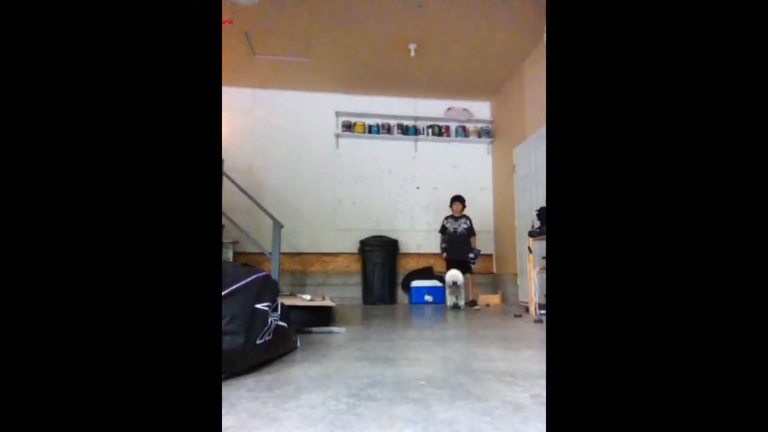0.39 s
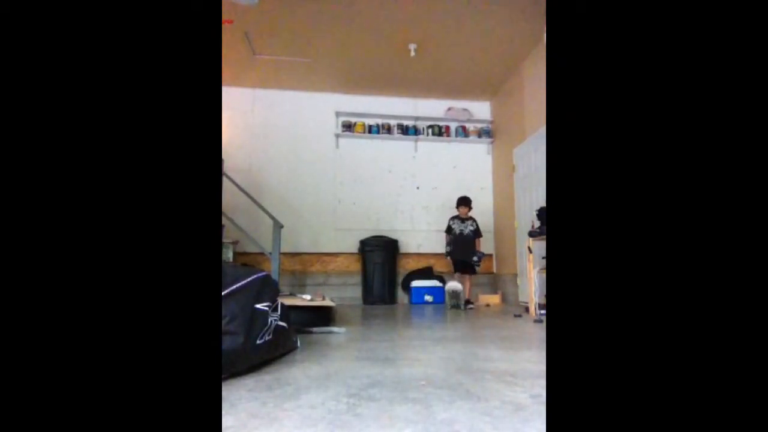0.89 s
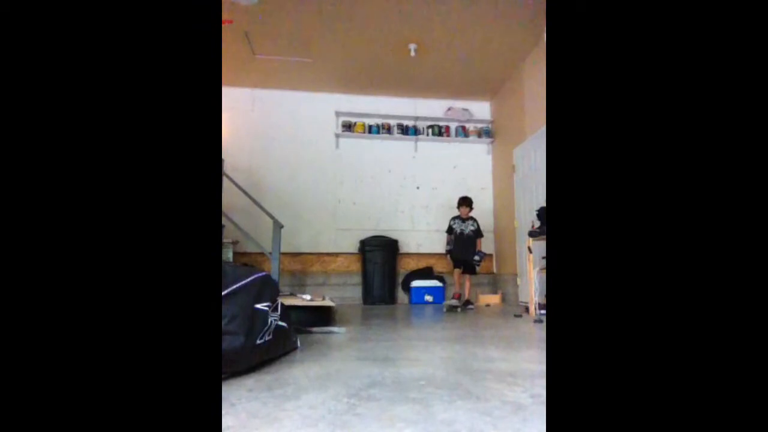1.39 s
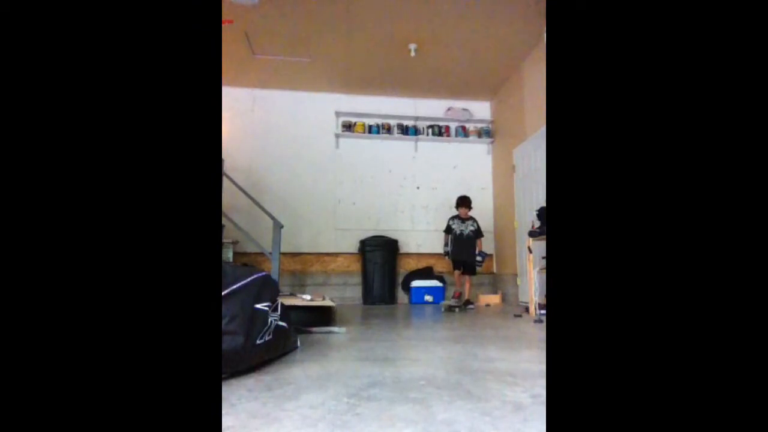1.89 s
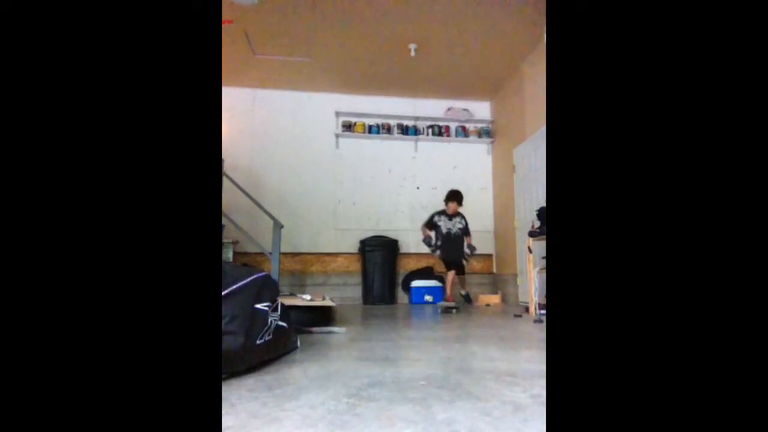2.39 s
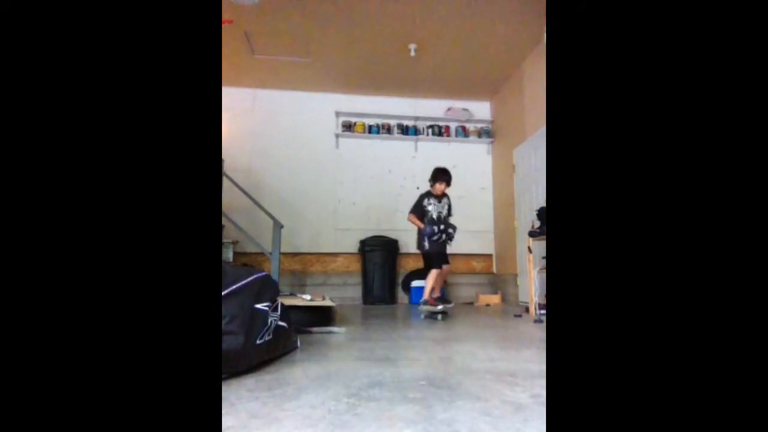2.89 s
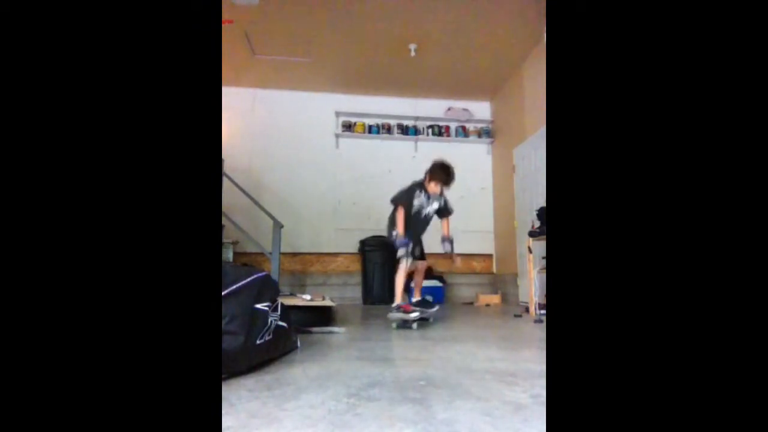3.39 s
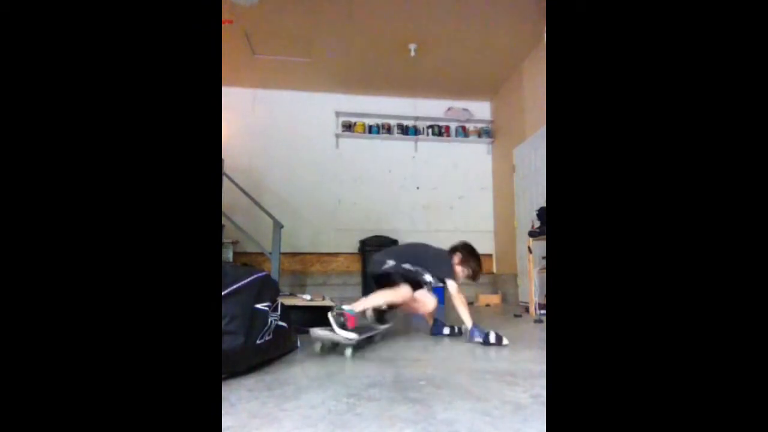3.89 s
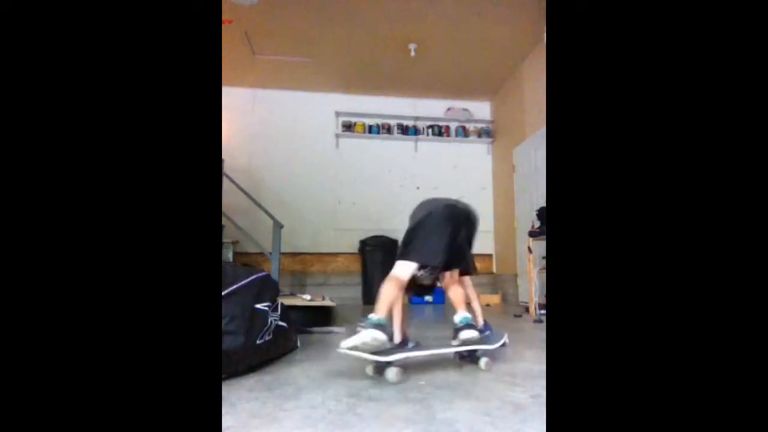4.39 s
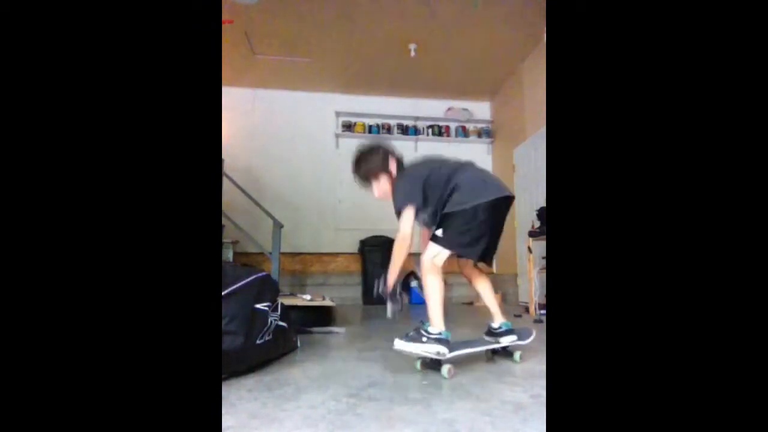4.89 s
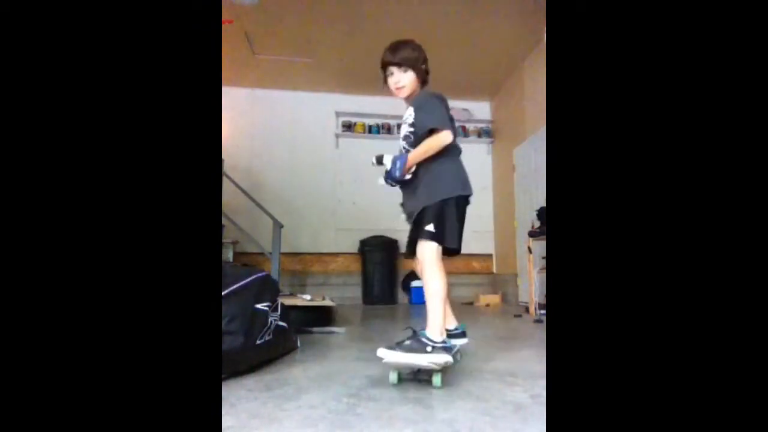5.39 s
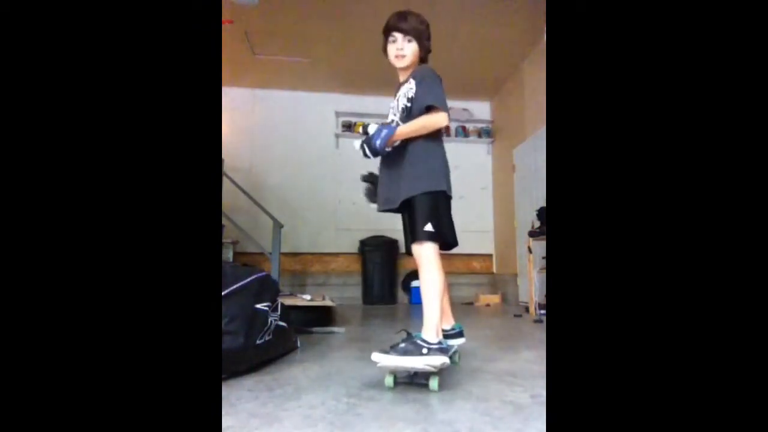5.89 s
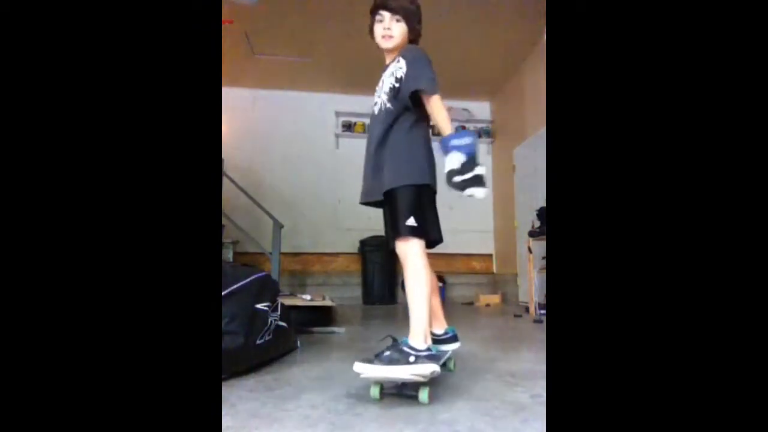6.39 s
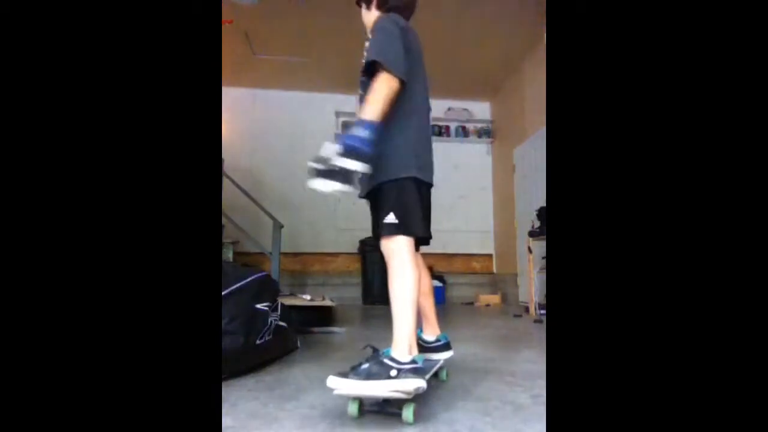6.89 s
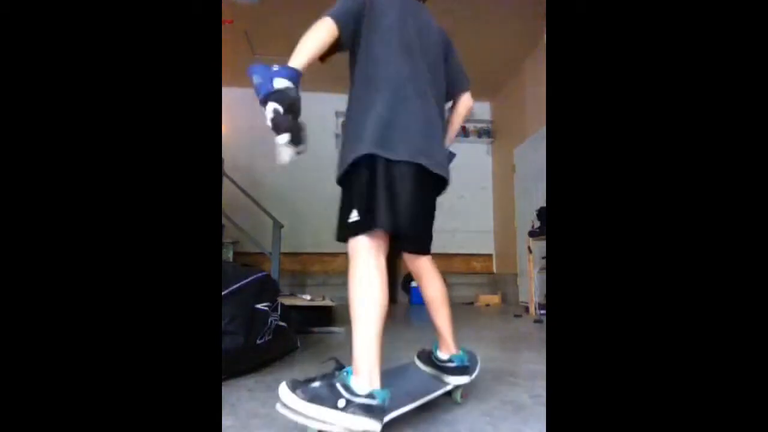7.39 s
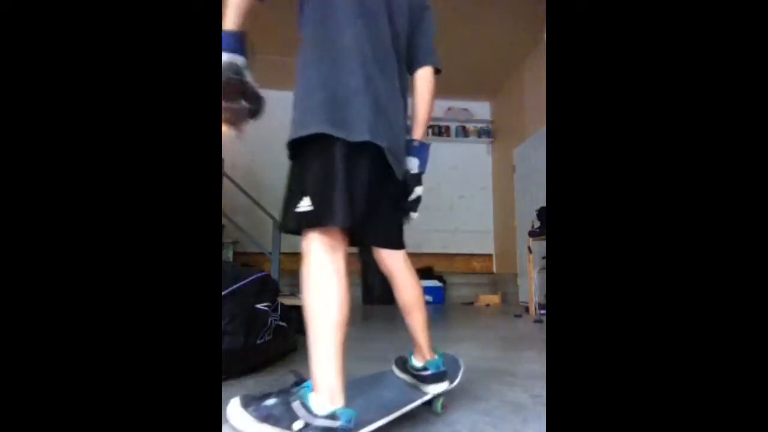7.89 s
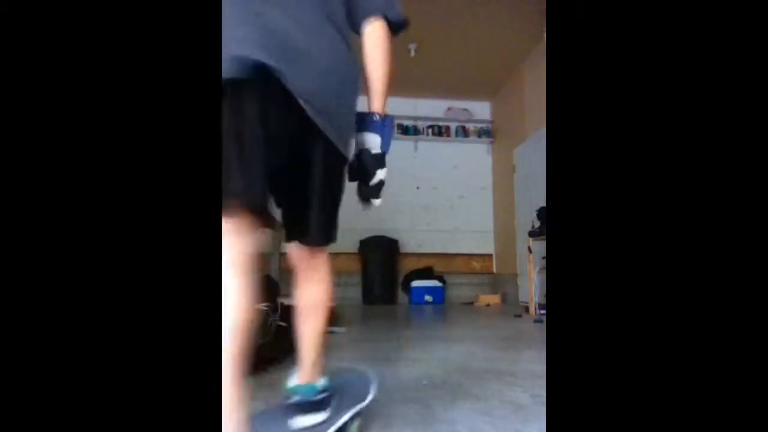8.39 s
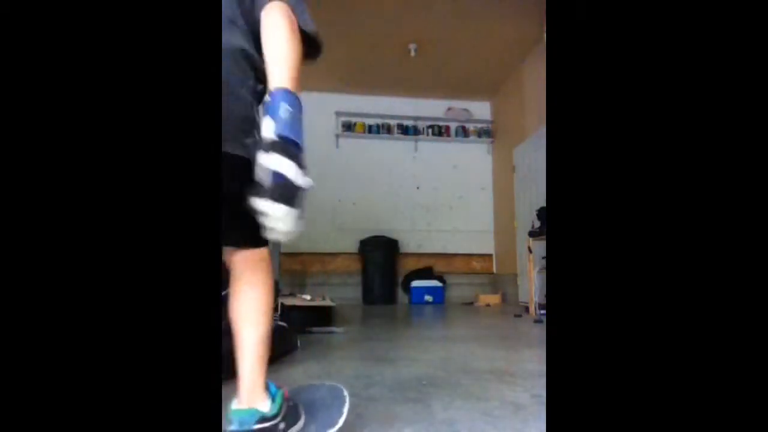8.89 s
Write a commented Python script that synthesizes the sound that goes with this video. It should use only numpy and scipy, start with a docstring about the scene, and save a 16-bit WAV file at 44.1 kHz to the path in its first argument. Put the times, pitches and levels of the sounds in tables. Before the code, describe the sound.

In a closed concrete garage, a skateboard lands with a quick rattle of clacks, then a loud slap. After a pause it is pushed off, its wheels rolling with a gritty wooden drone that swells into a harsh sliding scrape. Quiet ticks and creaks follow, then sharp knocks of small turns come closer. A phone on the floor hears it with a short room echo over faint hiss.

```python
"""A skateboard in a closed concrete garage, heard by a phone on the floor: it is dropped, pushed towards
the phone, slid sideways and then shuffled round in small kick turns. Knocks and grit under the wheels ring
the modes of the wooden deck; wheels and shoes scrape as shaped speckled noise, rubber sings as gliding
tones, bushings creak in trains of short scratches. A diffuse room tail answers over a faint noise hush."""
import sys
import numpy as np
from scipy import signal
from scipy.fft import rfft, irfft
from scipy.io import wavfile
from scipy.ndimage import uniform_filter1d

SR = 44100
rng = np.random.default_rng(int(sys.argv[2]) if len(sys.argv) > 2 else 0)


def dump_mix(stems):
    """Bounce the given channels to the path in sys.argv[1] as a 16-bit WAV at rate SR."""
    frames = np.atleast_2d(stems).T  # one column per channel
    limited = np.clip(frames, -1, 1)  # hard clip at full scale
    pcm = np.round(limited * 32767).astype(np.int16)
    wavfile.write(sys.argv[1], SR, pcm)


def gain_from_db(level_db):
    """Convert decibel levels to linear amplitude factors (20 dB per decade)."""
    decades = np.asarray(level_db, float) / 20
    return 10 ** decades


N = 397782
T = np.arange(N) / SR

# modes of deck, trucks and wheels: (pitch [Hz], level [dB])
BOARD = [(140, -36.5), (205, -16.5), (363, -5.5), (535, -0.5), (745, 3.5), (815, 3), (930, 2), (1060, 2.5),
         (1190, 3), (1340, 2.5), (1480, 4), (1620, 4.5), (1780, 5.5), (1950, 5.5), (2180, 3.5), (2340, 3),
         (2750, -3), (3710, 0), (4450, -4), (5300, -3.5), (6700, -4)]
BOARD_LOSS = 0.13  # mode width over mode pitch


def level(x, db=0):
    """Scale to an rms level."""
    return x * gain_from_db(db) / np.sqrt(np.mean(x ** 2))


def colour(x, points):
    """Shape the spectrum along (frequency [Hz], gain [dB]) points, joined over log frequency."""
    hz, db = np.transpose(points)
    f = np.maximum(np.arange(len(x) // 2 + 1) * SR / len(x), 1)
    gain = gain_from_db(np.interp(np.log(f), np.log(hz), db))
    return irfft(rfft(x) * gain, len(x))


def band(x, hz, width_hz):
    """One resonance, gain 1 at the centre."""
    return signal.lfilter(*signal.iirpeak(min(hz, 0.45 * SR), hz / width_hz, SR), x)


def curve_db(rows):
    """(time [s], level [dB]) rows joined over time, silent outside them."""
    time_s, db = np.transpose(rows)
    return np.interp(T, time_s, db, -110, -110)


def swell(peak_s, rise_s, hold_s, fall_s, db):
    """Gain that climbs 20 dB in rise_s, holds, and drops 20 dB in fall_s."""
    before = (peak_s - T) / rise_s
    after = np.maximum(T - peak_s - hold_s, 0) / fall_s
    return gain_from_db(db - 20 * np.maximum(before, after))


def grit(specks_per_s, spread_db):
    """Specks of grit struck at random moments, a few much bigger than the rest."""
    struck = rng.random(N) < specks_per_s / SR
    size = gain_from_db(spread_db * np.minimum(rng.exponential(size=N), 6))
    return level(struck * rng.standard_normal(N) * size)


def walk(rate_hz):
    """Random targets 1 / rate_hz apart, joined by slews; rms near 1."""
    k = int(SR / rate_hz)
    steps = np.repeat(rng.standard_normal(N // k + 1), k)
    return level(uniform_filter1d(steps, k)[:N])


def board(loss=BOARD_LOSS):
    """Every mode's ring after a tap, one row a mode, neighbours in opposite phase."""
    tap = 1.0 * (T[:SR // 8] == 0)
    return np.array([(-1) ** k * gain_from_db(db) * band(tap, hz, loss * hz) for k, (hz, db) in enumerate(BOARD)])


def near(hz, octaves):
    """How strongly a contact pitched at hz reaches each mode."""
    mode_hz = np.array(BOARD)[:, 0]
    return np.exp(-(np.log2(mode_hz / hz) / octaves) ** 2)


def deck(force):
    """Soft wheels reach only the plywood's modes; shifting feet damp now one mode, now another."""
    out = 0
    for k, (hz, db) in enumerate(BOARD):
        gain = (-1) ** k * gain_from_db(db + 1.64 * walk(14))
        softness = 1 + (hz / 2060) ** 8  # soft wheels shake the higher modes less
        out = out + gain * band(force, hz, BOARD_LOSS * hz) / softness
    return out


def hush():
    """One shaped noise for far traffic, air through the door and microphone hiss; a low wavering hum."""
    # background spectrum: (frequency [Hz], gain [dB])
    hush_spectrum = [(25, -20.5), (116, 2.5), (178, -3.5), (240, -2), (552, -14.5), (6730, -20.5),
                     (15500, -21.5)]
    air = level(colour(rng.standard_normal(N), hush_spectrum), -56.5) * gain_from_db(0.7 * walk(2.5))
    hum = level(band(rng.standard_normal(N), 138, 8), -66)
    return air + hum


def knocks():
    """Each blow rings the modes near its pitch over a wide snap and a low thud; direct sound and room send."""
    # knocks and ticks: (time [s], level [dB], pitch struck [Hz], snap re level [dB], deck body re level [dB])
    knock_rows = [(0.0105, -0.5, 2190, -12.5, -24.5), (0.0582, -5.5, 1540, -7, -13.5),
                  (0.093, -8.5, 2350, -6.5, -15.5), (0.131, -11.5, 1890, -8.5, -16),
                  (1.311, -5.5, 883, 0.5, -19), (1.32, 2.5, 1050, -3, -15.5), (1.335, -4.5, 900, -13, -15),
                  (2.29, -24.5, 734, 0, -6), (3.131, -6.5, 1760, 3, -14), (4.64, -27, 1600, 5.5, -7),
                  (4.8, -33, 820, -4, -8), (5.0365, -18.5, 2370, -13, -28), (5.0525, -15.5, 2500, -6, -31),
                  (5.363, 2.5, 790, 1.5, -21), (5.376, -2.5, 770, -7, -35), (6.117, -19, 3000, -2, -38),
                  (6.2403, -12, 2650, -7, -29), (7.112, -1.5, 3100, -8.5, -52), (7.241, -17, 1800, -6, -24),
                  (7.268, -21, 1000, -1, -7), (7.302, -7, 2480, -13, -21.5), (7.318, -4, 2450, -14, -23),
                  (7.329, -4.5, 1430, 0, -13.5), (7.671, -23, 2020, -12, -20), (7.693, 1, 1580, -1, -16.5),
                  (8.438, 0.5, 1240, -0.5, -14.5), (8.456, 1, 1270, 4.5, -13), (8.465, -8, 1590, 2.5, -8.5),
                  (8.777, -15, 1390, -0.5, -11.5), (8.37, -18, 1790, 0.5, -19)]
    # board to phone: (time [s], distance [m])
    distance_rows = [(0, 2.88), (2.3, 3.33), (7, 2.54), (8, 1.6), (9.02, 0.89)]
    echo_1m_db, rattle_s_per_m = -12, 0.0031  # room send at 1 m; decay of the smear
    t = T[:SR // 8]
    tap = 1.0 * (t == 0)
    modes = board()
    thud, body = near(150, 0.85) @ modes, near(557, 0.76) @ modes
    snap = band(band(tap, 2700, 7100), 3500, 11000)
    direct, send = np.zeros(N + len(t)), np.zeros(N + len(t))
    splinters = rng.standard_normal((len(knock_rows), len(t)))
    favour = gain_from_db(1.86 * rng.standard_normal((len(knock_rows), len(BOARD))))  # each spot favours other modes
    for (s, db, hz, snap_db, body_db), noise, share in zip(knock_rows, splinters, favour):
        metres = np.interp(s, *np.transpose(distance_rows))
        ring = (near(hz, 0.37) + gain_from_db(4) * near(hz, 1.09)) * share @ modes
        thud_db = body_db - 10  # a blow that flexes the deck has weight behind it
        parts = (ring, -5), (snap, snap_db), (body, body_db), (thud, thud_db)
        blow = gain_from_db(db) * sum(gain_from_db(part_db) * part / np.abs(part).max() for part, part_db in parts)
        # loose hardware and the surfaces close by smear the first milliseconds
        smear = gain_from_db(-24.5) * noise * np.exp(-t / (rattle_s_per_m * metres))
        rattle = gain_from_db(-0.5) * tap + smear
        i = int(s * SR)
        direct[i:i + len(t)] += signal.fftconvolve(blow, rattle)[:len(t)]
        send[i:i + len(t)] += blow * gain_from_db(echo_1m_db) * metres
    return direct[:N], send[:N]


def garage():
    """Room response: dense echoes that build up over the first trips and decay at a rate set per octave."""
    # reverberation: (frequency [Hz], time to fall 60 dB [s])
    room_t60 = [(120, 0.15), (700, 0.5), (1800, 0.37), (4500, 0.52), (12000, 0.38)]
    t = T[:SR]
    hz, t60_s = np.transpose(room_t60)
    tail = 0
    for centre_hz in 88 * 2 ** np.arange(8):
        decay_s = np.interp(np.log(centre_hz), np.log(hz), t60_s)
        edges_hz = [centre_hz / np.sqrt(2), centre_hz * np.sqrt(2)]
        sos = signal.butter(2, edges_hz, "band", fs=SR, output="sos")
        tail = tail + signal.sosfilt(sos, rng.standard_normal(SR)) * gain_from_db(-60 * t / decay_s)
    tail = tail * np.clip((t - 0.004) / 0.018, 0, 1)
    return tail / np.sqrt(np.sum(tail ** 2))


def shuffle():
    """Slow wheels drone in the deck; patchy rubs ring the trucks, each with its own brightness."""
    # slow wheels, shifting rider: (peak [s], 20 dB rise [s], 20 dB fall [s], deck drone level [dB])
    creep_rows = [(.14, 0.1, 0.43, -33), (5.341, 0.16, 0.28, -35.5), (6.0, 0.6, 19, -55.5),
                  (7.1, .5, 1, -51.5), (7.47, 0.22, 0.14, -31.5), (8.06, 0.17, 0.08, -34),
                  (8.42, 0.22, 0.27, -32), (8.78, 0.3, 0.14, -43.5), (9.02, 0.3, -5, -45.5)]
    # shoes, gloves and wheels rubbing: (time [s], length [s], level [dB], gain above 4.5 kHz [dB])
    scuff_rows = [(0.15, 0.345, -52, 11), (0.484, 0.15, -51.5, 12), (2.955, 0.039, -26, -11),
                  (5.005, 0.071, -35.5, -11), (5.93, 0.16, -47.5, -1.5), (6.25, 0.055, -36, -19),
                  (6.325, 0.15, -48, -2), (7.212, 0.3, -48.5, 14.5), (7.435, 0.062, -22.5, -10.5),
                  (8.003, 0.085, -36.5, 2.5), (8.268, 0.042, -41, -18), (8.323, 0.073, -37.5, -5),
                  (8.858, 0.061, -40, -0.5)]
    # rub spectrum: (frequency [Hz], gain [dB])
    scuff_spectrum = [(590, -21), (1000, -8.5), (1610, -8), (1940, -11), (2230, 0.5), (3800, -10),
                      (6700, -9.5), (16000, -32)]
    rise_share, release_s = 0.18, 0.018  # rise as a share of the length
    drone = level(deck(grit(3000, 2.75))) * gain_from_db(0.85 * walk(31))
    grains = grit(3500, 2.2)
    trucks = signal.oaconvolve(grains, near(3250, 0.16) @ board())[:N]
    rub = level(level(colour(grains, scuff_spectrum)) + level(trucks, -1.1)) * gain_from_db(2.66 * walk(60))
    top = signal.sosfilt(signal.butter(2, 4500, "high", fs=SR, output="sos"), rub)
    out = drone * sum(swell(s, rise_s, 0, fall_s, db) for s, rise_s, fall_s, db in creep_rows)
    for s, length_s, db, bright_db in scuff_rows:
        rise = np.clip((T - s) / (rise_share * length_s), 0, 1) ** 2
        release = np.clip((s + length_s - T) / release_s + 1, 0, 1)
        out = out + rise * release * gain_from_db(db) * (rub + (gain_from_db(bright_db) - 1) * top)
    return out


def bumps():
    """A chatter of grit rings the deck with broad, brief modes, favouring other modes each time."""
    # wheels settling or skipping: (time [s], length [s], level [dB], pitch struck [Hz])
    bump_rows = [(1.676, 0.021, -33.5, 1060), (1.813, 0.023, -34, 990), (1.888, 0.052, -44, 870),
                 (8.015, 0.013, -26.5, 2020), (8.051, 0.012, -33.5, 2230), (8.085, 0.0067, -36, 2200)]
    out, modes = np.zeros(N), board(0.17)
    favour = gain_from_db(1.2 * rng.standard_normal((len(bump_rows), len(BOARD))))
    for (s, length_s, db, hz), share in zip(bump_rows, favour):
        ring = (near(hz, 1.0) + 0.16) * share @ modes
        chatter = grit(5500, 2.5) * ((T > s) & (T < s + length_s))
        out += gain_from_db(db) * signal.oaconvolve(chatter, ring / np.sqrt(np.sum(ring ** 2)))[:N]
    return out


def roll():
    """Grit shakes the deck, urethane scrapes on concrete, the slab and trucks rumble."""
    # steady run towards the phone: (time [s], deck drone level [dB])
    roll_rows = [(2.285, -43), (2.52, -30.5), (2.9, -36), (3.3, -42), (3.7, -26.5), (3.9, -16), (4.06, -17),
                 (4.3, -24), (4.5, -31.5), (4.7, -37.5), (4.9, -60.5)]
    # pushes, weight shifts and slides that press the wheels down:
    # (peak [s], 20 dB rise [s], deck drone level [dB], scrape re drone [dB])
    surge_rows = [(2.312, 0.0068, -28, 1.5), (2.742, 0.17, -22, -11.5), (3.055, 0.113, -23, -8.5),
                  (3.131, 0.17, -20, -16), (3.5, 0.34, -25, -12), (3.79, 0.1741, -23, -11),
                  (4.098, 0.0757, -9.5, -10), (4.227, 0.1474, -17, -8), (4.36, 0.1014, -10, -5),
                  (4.386, 0.0425, -18, 1)]
    # scrape spectrum: (frequency [Hz], gain [dB])
    scrape_spectrum = [(1290, -28.5), (2200, 1), (4070, -2), (6260, -0.5), (7840, -6.5), (9410, -4),
                       (15200, -20.5)]
    # slab and trucks: (time [s], level [dB])
    rumble_rows = [(2.3, -47), (3.15, -42.5), (3.35, -46.5), (3.7, -32), (3.84, -24.5), (4.0, -35),
                   (4.4, -52)]
    hold_share, fall_share = 0.19, 0.93  # of a surge's rise
    steady_db = curve_db(roll_rows)
    load = gain_from_db(steady_db)
    slide = gain_from_db(1 + 1.587 * steady_db)  # scrape grows faster than drone
    for s, rise_s, db, scrape_db in surge_rows:
        press = swell(s, rise_s, hold_share * rise_s, fall_share * rise_s, db)
        load = np.hypot(load, press)
        slide = np.hypot(slide, press * gain_from_db(scrape_db))
    drone = level(deck(grit(4000, 1.85))) * load * gain_from_db(1.58 * walk(25.03))
    grains = grit(8000, 1.7)
    scrape = level(colour(grains, scrape_spectrum)) * slide * gain_from_db(3.58 * walk(40))
    rumble = level(band(band(rng.standard_normal(N), 135, 90), 160, 160))
    return drone + scrape + rumble * gain_from_db(curve_db(rumble_rows) + 2.5 * walk(12))


def squeals():
    """Dragging rubber sings: a wavering, patchy tone that glides from one pitch to the other."""
    # drags: (time [s], length [s], start pitch [Hz], end pitch [Hz], level [dB])
    squeal_rows = [(4.081, 0.32, 340, 401, -28.5), (7.987, 0.046, 3850, 3800, -44),
                   (8.317, 0.051, 3800, 3880, -40)]
    out = 0
    for s, length_s, start_hz, end_hz, db in squeal_rows:
        part = np.clip((T - s) / length_s, 0, 1)
        hz = (start_hz + (end_hz - start_hz) * part) * (1 + 0.0243 * walk(500))
        tone = np.sin(2 * np.pi * np.cumsum(hz) / SR)
        fade = np.sqrt(np.sin(np.pi * part).clip(0))
        out = out + gain_from_db(db + 4 * walk(120)) * fade * tone
    return out


def creak():
    """Rubber sticks and lets go at uneven gaps; each slip is a short scratch through trucks and deck."""
    # truck bushings in stick-slip: (time [s], length [s], nominal rate [ticks/s], level [dB])
    creak_rows = [(5.828, 0.14, 81, -53), (5.949, 0.092, 110, -51)]
    # single slips of bushing or shoe: (time [s], level [dB])
    slip_rows = [(5.0133, -30), (6.037, -28), (6.166, -34), (6.1847, -26), (6.3698, -25), (6.395, -28.5),
                 (6.418, -39), (6.462, -31), (7.0843, -21), (7.094, -23), (7.442, -16)]
    slips = np.zeros(N)
    for s, length_s, rate_hz, db in creak_rows:
        gap, size = rng.standard_normal((40, 2)).T
        at_s = s + np.cumsum(np.exp(0.24 * gap)) / rate_hz
        keep = at_s < s + length_s
        slips[(at_s[keep] * SR).astype(int)] = gain_from_db(db + 4.2 * size[keep]) * np.sqrt(SR / rate_hz)
    for s, db in slip_rows:
        slips[int(s * SR) + SR // 800] = gain_from_db(db) * np.sqrt(SR / 400) / 2  # centre of the scratch
    # each slip lasts 1/400 s
    scratch = uniform_filter1d(slips, size=SR // 400) * rng.standard_normal(N) * np.sqrt(SR / 400)
    tick = near(2350, 1.66) @ board()
    return signal.oaconvolve(scratch, tick / np.sqrt(np.sum(tick ** 2)))[:N]


def scene():
    """Board sounds reach the phone directly and again through the room; the hush is added as it is."""
    moving = roll() + shuffle() + creak() + bumps() + squeals()
    direct, send = knocks()
    wet = signal.fftconvolve(send + moving * gain_from_db(-10.5), garage())[:N]
    return (direct + moving * gain_from_db(-4) + wet + hush())[None]


def top_cut(x):
    """Nothing passes above the cut-off."""
    return signal.sosfilt(signal.butter(12, 16650, fs=SR, output="sos"), x)


def record(dry):
    """The phone's microphone dulls the top and rounds the loudest peaks; the deepest bass is cut."""
    mic = signal.sosfilt(signal.butter(2, 11500, fs=SR, output="sos"), dry)
    rounded = np.tanh(1.039 * mic) / np.tanh(1.1)
    mix = signal.sosfilt(signal.butter(1, 45, "high", fs=SR, output="sos"), rounded)
    return top_cut(mix)


dry = scene()
out = record(dry)
dump_mix(out)
```